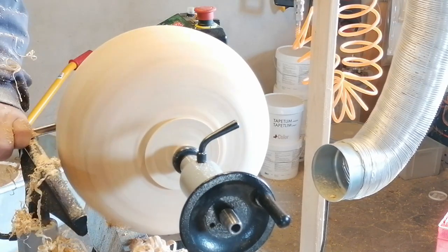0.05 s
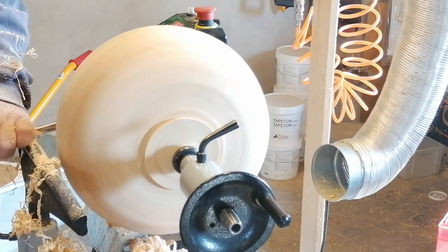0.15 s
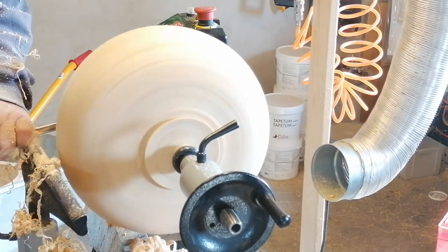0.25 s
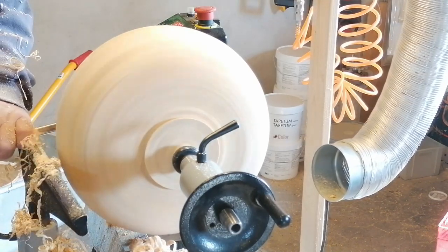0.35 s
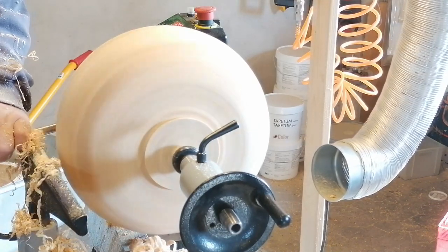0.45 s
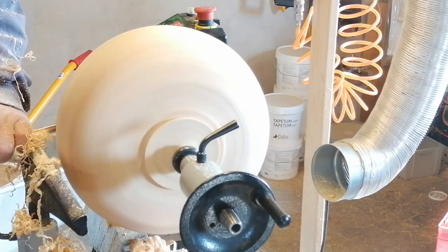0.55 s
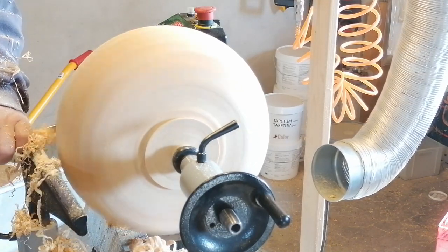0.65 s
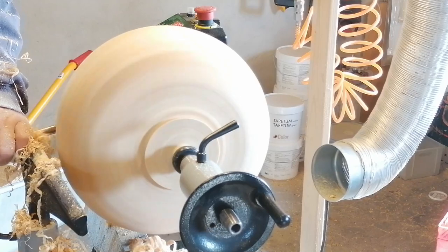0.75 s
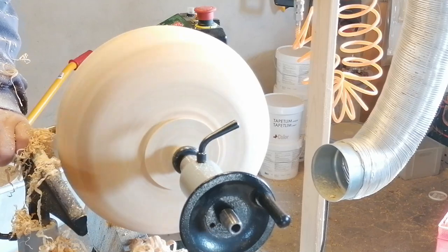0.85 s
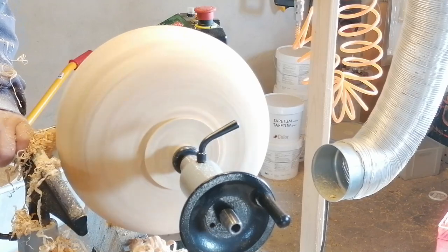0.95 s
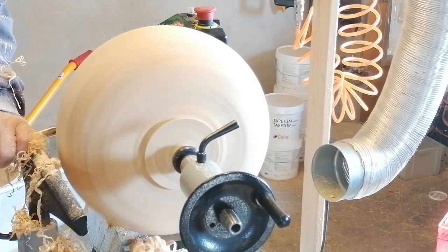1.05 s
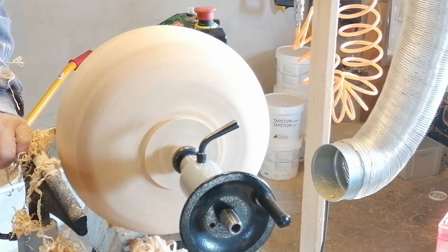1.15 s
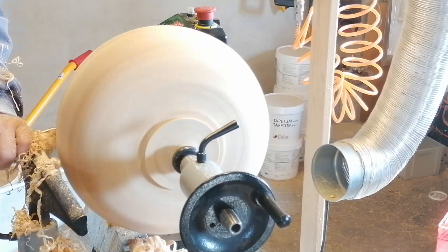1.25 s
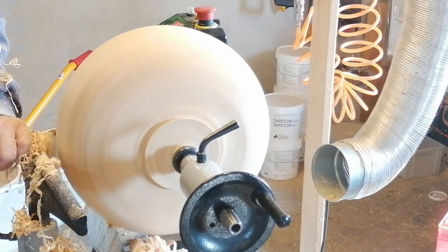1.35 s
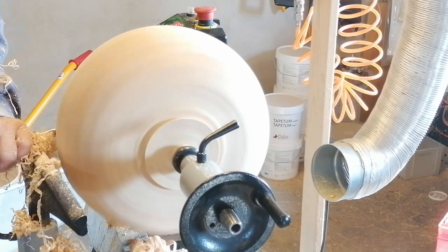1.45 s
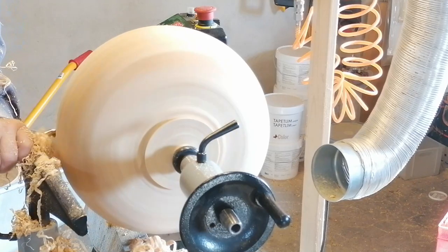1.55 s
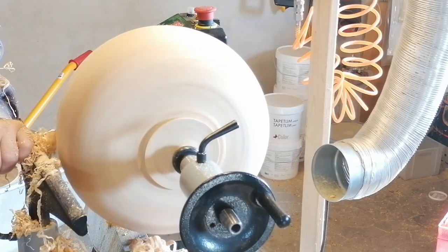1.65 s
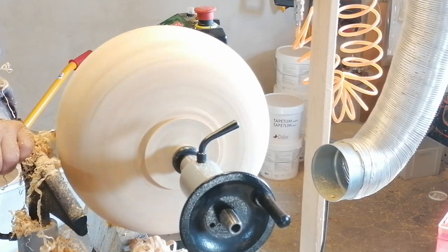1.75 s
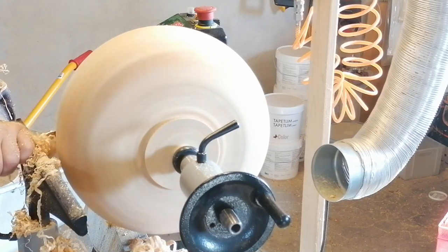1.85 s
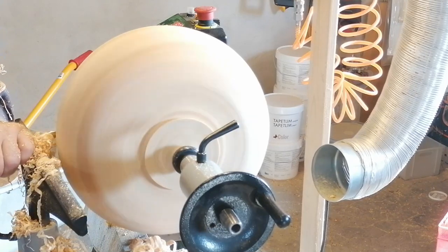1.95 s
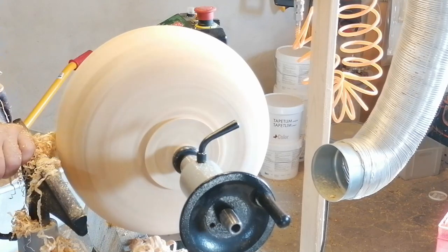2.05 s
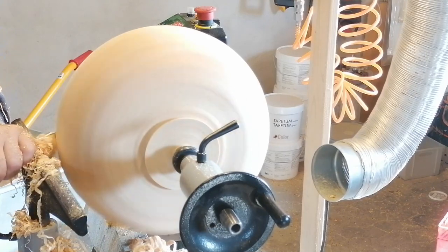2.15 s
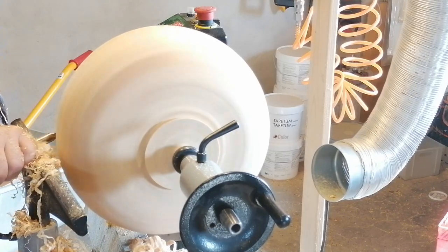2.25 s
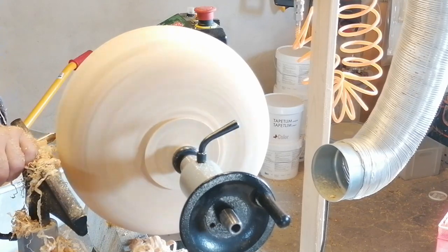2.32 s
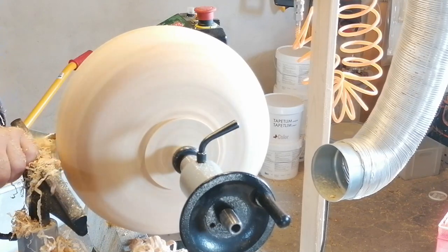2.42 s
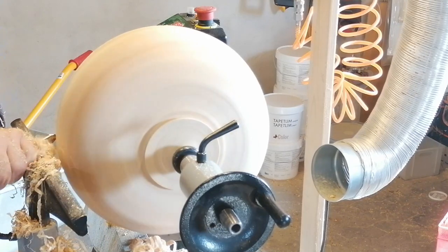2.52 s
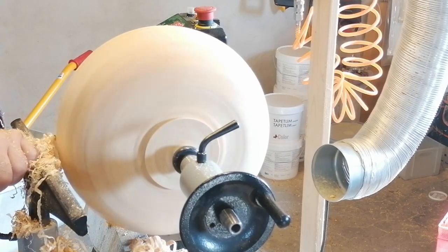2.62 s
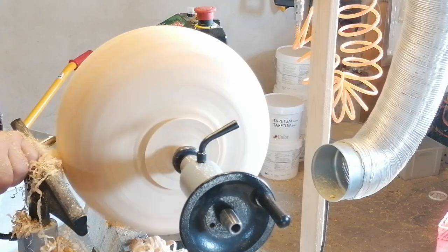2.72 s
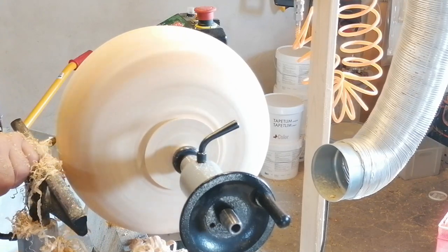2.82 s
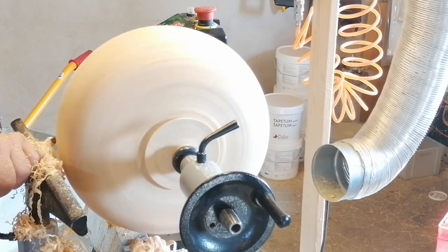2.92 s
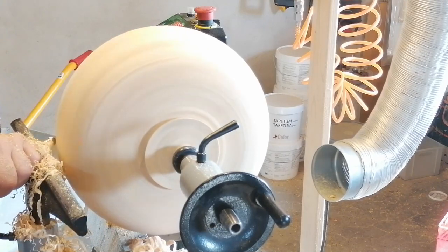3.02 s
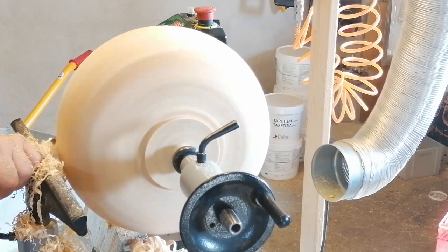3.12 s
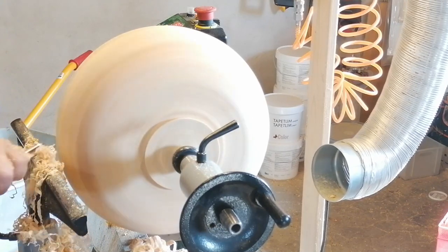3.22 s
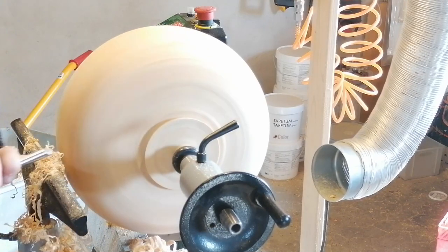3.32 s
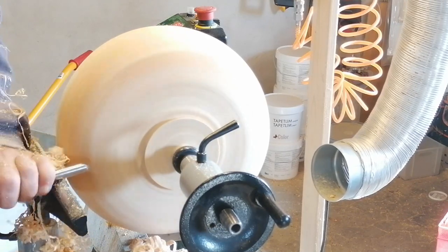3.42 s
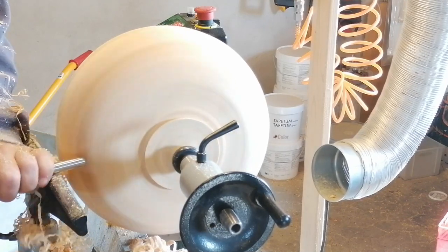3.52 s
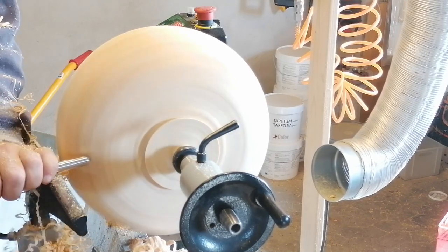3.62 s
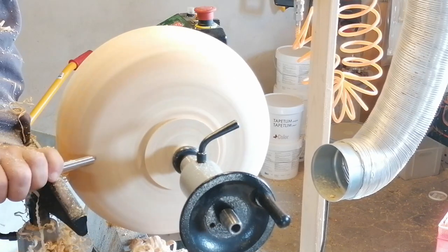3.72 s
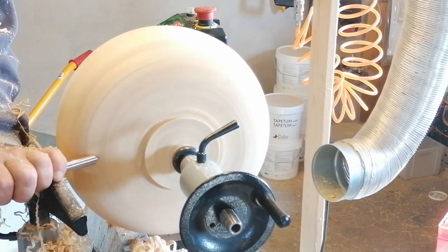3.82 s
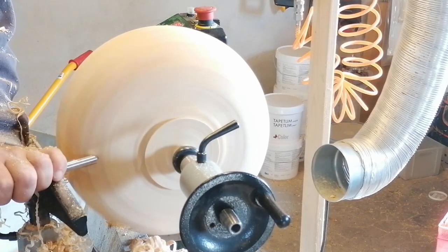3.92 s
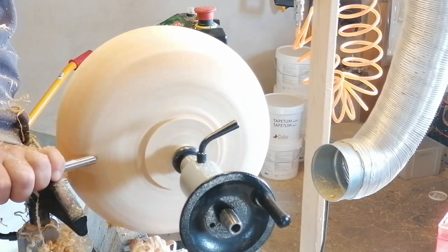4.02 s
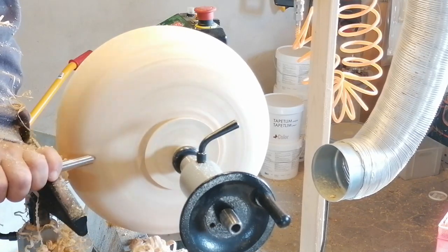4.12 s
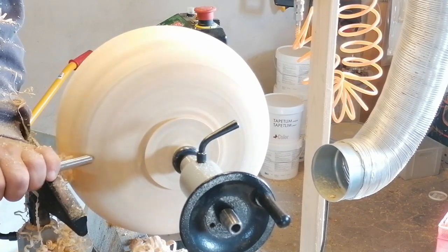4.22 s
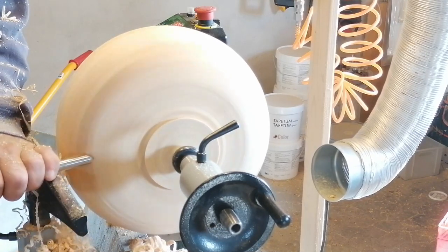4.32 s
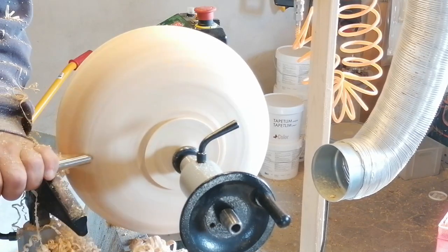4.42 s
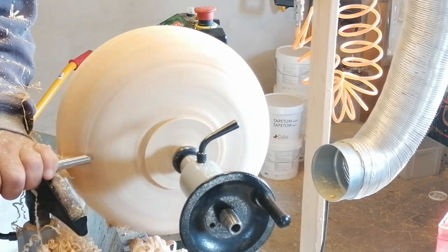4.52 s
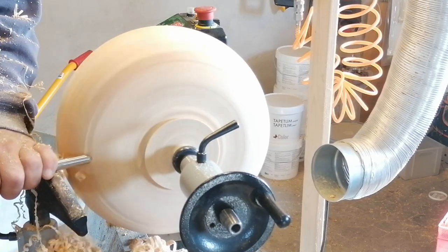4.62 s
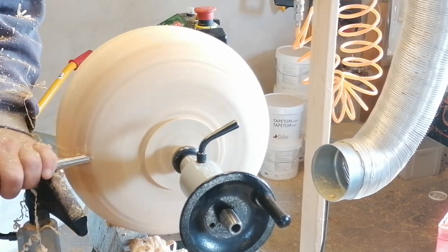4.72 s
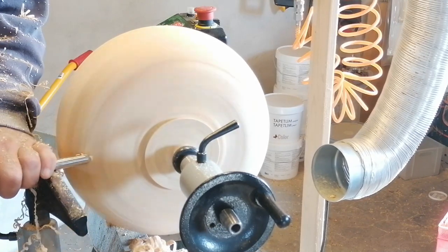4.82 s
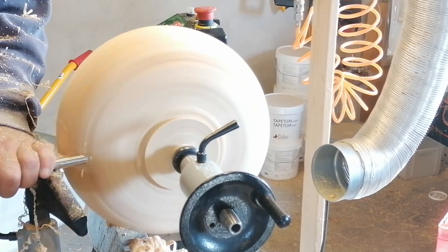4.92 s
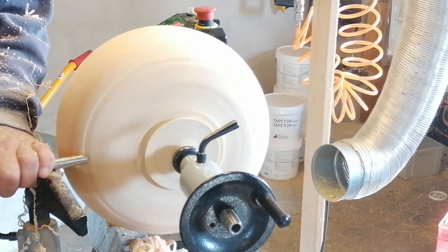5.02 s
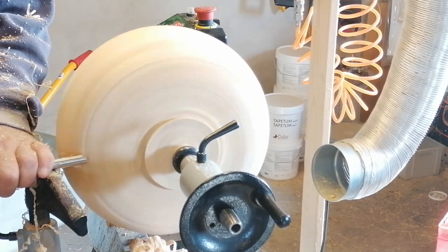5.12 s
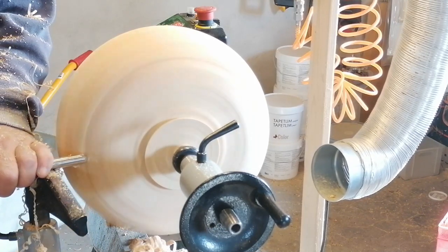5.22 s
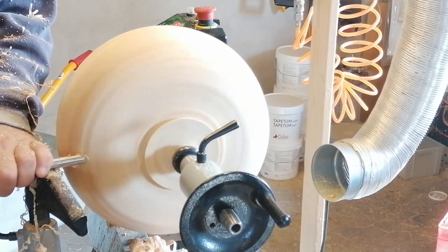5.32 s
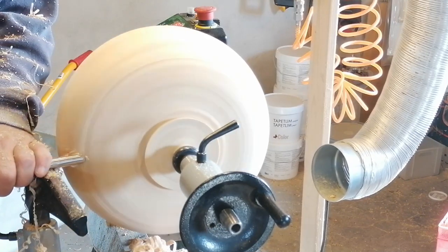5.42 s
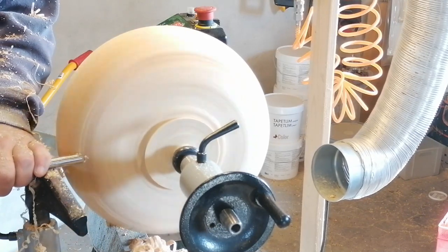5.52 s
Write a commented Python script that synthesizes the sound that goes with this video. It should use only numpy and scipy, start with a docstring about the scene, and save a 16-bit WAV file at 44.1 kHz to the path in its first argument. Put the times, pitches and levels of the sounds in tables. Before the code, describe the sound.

A wood lathe runs throughout with a quiet motor hum and a faint, very high whistle, heard close in a small, fairly dry workshop. After a few light touches, a gouge bites into the spinning bowl at about 0.3 seconds. It peels shavings with a rough, hissing rasp, fluttering rapidly as the grain comes round, with a slight metallic ring from the tool. From about 0.7 to 3.1 seconds a thin squeal comes in several pushes, each gliding slightly upward. The cut ends near 3.3 seconds, leaving only the machine. At 3.5 seconds the steel tool slides briefly onto its rest and knocks once, lightly. A second cut begins at about 3.9 seconds with much less squeal. From 4.4 seconds it turns into a harder, fast, regular chatter of tearing wood, continuing until the end at about 5.5 seconds.

```python
"""Turning a wooden bowl

A gouge peels a spinning bowl blank on a lathe in a small workshop. Tearing fibres excite the modes
of the tool, its rest and the wood; end grain comes round twice a turn and makes the edge bite harder,
and the curling shaving squeals. Between two cuts the tool is set down on the rest. Throughout, the
motor hums and its drive whistles faintly."""
import sys
import numpy as np
from scipy import signal
from scipy.fft import rfft, irfft, next_fast_len
from scipy.io import wavfile
from scipy.ndimage import uniform_filter1d

SR = 44100
rng = np.random.default_rng(int(sys.argv[2]) if len(sys.argv) > 2 else 0)


def bounce(signal):
    """Save signal as a 16-bit WAV file at the path given by the first command-line argument."""
    frames = np.transpose(np.atleast_2d(signal))
    limited = np.clip(frames, -1, 1)
    pcm = np.round(limited * 32767).astype(np.int16)
    wavfile.write(sys.argv[1], SR, pcm)


N = 245195
NOMINAL_FORCE_DB, MODE_WANDER_DB = -47, 1.6


def amp(db):
    """Amplitude ratio of a level in decibels."""
    return 10 ** (np.asarray(db) / 20)


def unit_rms(x):
    """Normalisation to unit power."""
    return x / np.sqrt(np.mean(x ** 2) + 1e-20)


def in_time(rows):
    """Linear interpolation of rows (time_s, values...): one curve per value column."""
    times, *columns = np.transpose(rows)
    return np.array([np.interp(np.arange(N) / SR, times, column) for column in columns])


def colour(x, points):
    """Spectral shaping by a curve of (frequency_hz, gain_db) on a logarithmic frequency axis."""
    size = next_fast_len(N)
    hz = np.maximum(np.arange(size // 2 + 1) * SR / size, 1)
    point_hz, point_db = np.transpose(points)
    gain = amp(np.interp(np.log(hz), np.log(point_hz), point_db))
    return irfft(rfft(x, size) * gain, size)[..., :N]


def cutoff(x, order, hz, kind="low"):
    """Maximally flat low-pass or high-pass filter."""
    return signal.sosfilt(signal.butter(order, hz, kind, fs=SR, output="sos"), x)


def drift(rate_hz):
    """Random modulation: low-passed noise of unit spread."""
    step = 40
    r = np.exp(-2 * np.pi * step * rate_hz / SR)
    slow = signal.lfilter([1], [1, -2 * r, r * r], rng.standard_normal(N // step + 2002))[2000:]
    return np.interp(np.arange(N) / step, np.arange(len(slow)), unit_rms(slow))


def resonator(hz, width_hz):
    """Filter coefficients of a damped oscillator with unit peak gain."""
    r = np.exp(-np.pi * width_hz / SR)
    return [(1 - r * r) / 2, 0, (r * r - 1) / 2], [1, -2 * r * np.cos(2 * np.pi * hz / SR), r * r]


def resonance(x, hz, width_hz):
    """Forced response of one mode."""
    return signal.lfilter(*resonator(hz, width_hz), x)


def lathe():
    """Machine noise: broadband rumble, narrow bands of motor hum and the drive's phase-modulated whistle."""
    # rumble spectrum: frequency_hz, density_db
    rumble = [(12, -57), (20, 1.5), (53, -6), (76, -6.5), (223, -9.5), (263, -5.5), (347, -13), (525, -7.5),
              (620, -8.5), (940, -9.5), (1460, -15.5), (11500, -33.5), (12030, -17), (12600, -43),
              (15000, -60)]
    # motor bands: centre_hz, width_hz, level_db
    motor = [(436.7, 34, -80), (514, 25, -78), (875, 6.7, -102), (1880, 18, -91)]
    white = rng.standard_normal((3, N))
    noise = amp(-72.5) * unit_rms(colour(white, rumble))
    for hz, width_hz, db in motor:
        noise += amp(db) * unit_rms(resonance(white, hz, width_hz))
    whistle_hz, whistle_db = 12023, -84
    whistle = np.sin(2 * np.pi * whistle_hz * np.arange(N) / SR + .9 * drift(12))
    stereo = .75 * noise[0] + .65 * noise[1:]
    return stereo + amp(whistle_db + .74 * drift(27)) * whistle


def bites():
    """Quasi-periodic forcing: end grain meets the edge each half turn. Rows: start_s, level_db, length_s."""
    # single bites and catches: start_s, level_db, length_s
    catches = [(0.092, -55.5, 0.037), (0.1201, -55.5, 0.045), (0.1615, -48.5, 0.023), (0.2534, -46, 0.017),
               (0.331, -30, 0.012), (0.3592, -32.5, 0.01), (0.446, -35, 0.0099), (0.552, -30.5, .014),
               (0.594, -30, 0.0075), (0.621, -28.5, 0.0061), (0.7085, -34, 0.012), (.763, -43, .015),
               (0.7982, -33, 0.019), (0.9832, -29.5, 0.0083), (1.2052, -29.5, 0.0043),
               (1.424, -33.5, 0.008), (1.514, -32.5, 0.0066), (1.996, -41, 0.0076), (2.1635, -35.5, 0.0055),
               (2.6719, -30, 0.0043), (2.7143, -29, 0.0078), (2.735, -36.5, 0.014), (2.847, -33.5, 0.011),
               (2.963, -36, 0.015), (2.982, -38, .015), (3.136, -35, 0.009), (3.915, -36.5, 0.016),
               (3.959, -33, 0.01), (4.001, -33, 0.016), (4.172, -33.5, 0.016), (4.385, -30, 0.016),
               (4.395, -35, 0.0061), (4.399, -30, 0.012), (4.441, -25.5, 0.011), (4.484, -26, 0.011),
               (4.527, -26.5, 0.013), (4.569, -28.5, 0.021), (4.606, -30, 0.014), (4.651, -27.5, 0.013),
               (4.695, -26, 0.012), (4.74, -28, 0.012), (4.784, -30.5, 0.017), (4.826, -29.5, 0.015),
               (4.869, -28, 0.012), (4.909, -29, 0.021), (4.955, -26.5, 0.0079), (4.985, -31.5, 0.017),
               (5.038, -28.5, 0.016), (5.084, -25.5, 0.016), (5.127, -26, 0.012), (5.17, -30.5, 0.022),
               (5.216, -28.5, 0.015), (5.219, -29, 0.0019), (5.257, -29.5, 0.012), (5.268, -29.5, 0.0048),
               (5.301, -29, 0.014), (5.339, -28, 0.02), (5.386, -30, 0.019), (5.428, -32.5, 0.015),
               (5.473, -34, .01), (5.493, -30, 0.012), (5.517, -27.5, 0.011), (5.526, -32, 0.0039)]
    # runs of bites: first_s, last_s, first_db, last_db, length_s, alternate_drop_db
    runs = [(0.289, 0.415, -37.5, -43.5, 0.041, -7), (0.5026, 0.9806, -34, -36.5, 0.015, 4),
            (1.224, 1.354, -37.5, -36.5, 0.029, 1), (1.448, 1.8442, -37.5, -36.5, 0.019, 3),
            (1.906, 2.127, -38.5, -35.5, 0.017, -2), (2.212, 2.645, -34.5, -36.5, 0.012, 1),
            (2.796, 2.93, -36, -38.5, 0.023, -1.5), (3.019, 3.097, -37, -36.5, .016, 2.5),
            (3.171, 3.259, -41, -35, 0.03, -0.5), (4.05, 4.132, -30.5, -33, 0.011, 6),
            (4.204, 4.343, -33, -34, 0.026, -1.5), (5.405, 5.446, -33, -38, 0.025, -5.5)]
    half_turn_s, scatter_s, scatter_db = .04325, .0015, 1.8
    rows = list(catches)
    for first_s, last_s, first_db, last_db, length_s, alternate_drop_db in runs:
        count = round((last_s - first_s) / half_turn_s) + 1
        scatter = rng.standard_normal((count, 2)) * [scatter_s, scatter_db]
        starts = np.linspace(first_s, last_s, count) + scatter[:, 0]
        levels = np.linspace(first_db, last_db, count) + scatter[:, 1]
        levels[1::2] -= alternate_drop_db
        rows += zip(starts, levels, np.full(count, length_s))
    return rows


def cutting_force():
    """Incoherent addition: the powers of steady peeling and of bites sum to the force envelope squared."""
    # steady peeling, one list per cut: time_s, level_db
    cuts = [
        [(0.27, -64), (0.36, -47.5), (0.48, -42.5), (1.1, -47.5), (1.45, -46.5), (1.81, -47.5), (2.43, -47),
         (2.82, -48), (3.28, -50), (3.36, -85)],
        [(3.93, -57), (3.974, -57), (4.096, -45), (4.392, -49.5), (4.932, -45), (5.062, -43), (5.56, -44.5)],
    ]
    outline = []
    for cut in cuts:
        outline += [(cut[0][0] - .01, -110), *cut, (cut[-1][0] + .0068, -110)]
    peeling = amp(in_time(outline)[0] + 1.5 + 1.6 * drift(112)) ** 2
    biting = np.zeros(N)
    t = np.arange(int(.06 * SR)) / SR
    centre_s, lead_s = .03, .003
    let_go = 1 - .5 * np.exp(-((t - centre_s) / .005) ** 2)   # the shaving lets go just before each bite
    for start_s, db, length_s in bites():
        rise = (1 - np.exp(-t / (.24 * length_s))) ** 2
        fall = np.exp(-(t / max(length_s, .003)) ** 3)
        bite, dip = int(start_s * SR), int((start_s - lead_s - centre_s) * SR)
        biting[bite:bite + len(t)] += amp(db - 6.5) ** 2 * (rise * fall)[:N - bite]
        peeling[dip:dip + len(t)] *= let_go[:N - dip]
    return np.sqrt(peeling + biting)


def fibres(per_s, spread_db):
    """Shot noise: fibres snap as random impulses of uneven size."""
    sizes = amp(spread_db * np.minimum(rng.exponential(1, (3, N)), 5)) * rng.standard_normal((3, N))
    return unit_rms(sizes * (rng.random((3, N)) < per_s / SR))


def tearing(snaps, force, mean_force):
    """Amplitude-modulated shot noise: the lows follow each bite, the top less so; a light touch is dull."""
    # tearing spectrum: frequency_hz, density_db
    spectrum = [(180, -63), (300, -16), (507, -24.5), (932, -8), (1030, -2.5), (1450, -12), (1880, -2.5),
                (2150, 4), (2620, 0.5), (2940, -6), (3600, -11), (4520, -3.5), (5310, -6.5), (7600, -8),
                (8250, -11), (9000, -6.5), (10400, -13), (11300, -16.5), (15200, -64)]
    broad = unit_rms(colour(snaps, spectrum))
    low = cutoff(broad, 2, 8500)
    excess = (force / amp(NOMINAL_FORCE_DB)) ** .053 - 1   # the treble grows faster than the force
    crisp = cutoff(low, 2, 2680, "high") * force * excess
    contact = np.minimum(mean_force / amp(-78), 1)
    top = (broad - low) * contact * force ** .42 * mean_force ** .62
    return amp(-8) * (low * force + crisp + top)


def dust_hiss(force, mean_force):
    """High-passed noise of the finest dust, modulated mainly by the mean force."""
    # hiss envelope: time_s, gain_db
    level = [(0.3, -15), (0.9, -21), (1.5, -22), (2.0, -19), (2.6, -16), (3.3, -14), (3.95, -16),
             (4.4, -16), (4.8, -10.5), (5.2, -21), (5.55, -25)]
    top = cutoff(rng.standard_normal((3, N)), 4, 11000, "high")
    hiss = colour(top, [(11000, -8), (13000, -6), (15000, -15.5)])
    return hiss * amp(in_time(level)[0]) * force ** .33 * mean_force ** .6


def squeal_curve():
    """Envelope and glide of the squeal over each push of the tool. Rows: time_s, gain_db, pitch_hz."""
    # pushes: start_s, end_s, gain_db, from_hz, to_hz
    pushes = [(0.73, 1.008, -3, 2940, 3560), (1.178, 1.467, -2.5, 3560, 3740),
              (1.467, 1.878, 2.5, 3370, 3600), (1.924, 2.306, 1, 3200, 3770),
              (2.534, 3.1, -6.5, 3400, 3860), (3.953, 4.298, -15, 3830, 3620),
              (4.403, 5.1, -28, 3340, 3200)]
    fade_share, idle_db = .19, -9.5
    rows = []
    for start_s, end_s, db, from_hz, to_hz in pushes:
        ends_db = min(db, idle_db)
        for part, gain_db in (0, ends_db), (fade_share, db), (1 - fade_share, db), (1, ends_db):
            rows.append((start_s + (end_s - start_s) * part, gain_db, from_hz + (to_hz - from_hz) * part))
    return rows


def squeal(drive):
    """Time-varying resonance: the curling shaving rings at a gliding pitch."""
    gain_db, pitch_hz = in_time(squeal_curve())
    drive = drive * amp(gain_db + 5.5 + MODE_WANDER_DB * drift(.34))
    out, state = np.zeros_like(drive), np.zeros((len(drive), 2))
    for i in range(0, N, 256):
        b, a = resonator(pitch_hz[i], width_hz=320)
        out[:, i:i + 256], state = signal.lfilter(b, a, drive[:, i:i + 256], zi=state)
    return out


def ringing(drive, force):
    """Modal superposition: snapping fibres drive the resonances of tool, rest, wood and shavings."""
    # mode groups: pitch_hz, width_hz, level_db, partner (-1 low, 1 high, 0 none)
    bed = [(115, 25, 0, 0), (195, 25, -1, 0)]
    rest = [(283, 36, 1.2, 0), (1394, 47, 11.7, 0), (7080, 240, 4.8, 0)]
    hollow = [(742, 26, 1, 0)]
    wood = [(830, 36, 1.5, 1), (1110, 90, -26, -1), (1266, 24, 2, 0)]
    rim = [(1530, 45, -8.5, 0), (1700, 260, 11.5, 0)]
    shank = [(2048, 63, 16, -1), (2192, 29, 6.4, 1), (2236, 33, 5.9, 1)]
    flute = [(2869, 40, 11.5, -1), (2930, 60, 8, 1), (3010, 70, 10.5, 1)]
    curl = [(3200, 46, 0, 0), (3370, 99, -5, 0), (3573, 51, -4, 0), (3753, 110, -1, 0), (4340, 76, -12, 0)]
    edge = [(3996, 52, 0.0045, 0)]
    tip = [(5155, 180, -4, 0), (4660, 110, -2.5, 0), (5000, 93, -1.5, 0), (5060, 40, 2.5, 0)]
    shavings = [(9980, 180, -20.5, 0), (9230, 370, -15.5, 0)]
    # group envelopes: time_s, gain_db
    bed_level = [(0.3, -24), (1.3, -28), (1.8, -30), (2.2, -30), (4.35, -22), (4.75, -17), (5.15, -23),
                 (5.55, -30.5)]
    rest_level = [(0.3, -22), (0.9, -35), (2.1, -41), (2.3, -37), (3.3, -41), (3.95, -14.5), (4.01, -8),
                  (4.17, -13.5), (4.27, -19), (5.3, -29.5), (5.42, -19), (5.55, -20.5)]
    hollow_level = [(0.3, -10.5), (0.6, -14.5), (0.9, -12.5), (1.2, -18), (1.6, -37), (1.8, -16.5),
                    (2.2, -14), (2.45, -32), (2.8, -16), (3.3, -29), (3.95, -19), (4.3, -30), (4.45, -32),
                    (5.55, -46)]
    wood_level = [(0.3, -15), (0.5, -8), (0.7, -23), (2.2, -21), (3.3, -16), (3.95, -26), (4.4, -13),
                  (5.15, -13), (5.55, -16)]
    rim_level = [(0.3, -12.5), (0.55, -8.5), (0.7, -18), (1.2, -14.5), (1.6, -14.5), (2.2, -16.5),
                 (2.7, -18), (3.3, -18.5), (3.95, -13), (4.4, -13.5), (5.0, -14.5), (5.55, -17.5)]
    shank_level = [(0.27, -24), (0.34, -12), (0.6, -12), (1.1, -8.5), (1.4, -12), (1.6, -0.5), (1.9, -21),
                   (2.4, -11.5), (2.6, -7.5), (2.72, 0), (3.0, -7.5), (3.3, -3), (3.95, -22), (4.15, -10),
                   (4.35, -10), (4.8, -9.5), (5.2, -7.5), (5.55, -9)]
    flute_level = [(0.3, -16.5), (0.65, -22), (0.82, -8), (1.1, -16), (1.3, -10), (1.8, -6), (2.0, -13),
                   (2.1, -14.5), (2.6, -20), (2.68, -8.5), (2.76, -19.5), (3.3, -19), (3.95, -12),
                   (4.3, -16.5), (4.45, -10.5), (5.0, -11), (5.55, -9.5)]
    edge_level = [(0.299, -20), (0.6, -9), (1.0, -5), (1.15, -12), (1.3, -1), (1.45, -4), (1.6, -11),
                  (1.95, -1), (2.05, -7), (2.2, 4), (2.35, -11), (2.85, -3.5), (3.3, -18), (3.95, -18),
                  (4.1, -12), (4.3, -13), (5.55, -19)]
    tip_level = [(0.3, -13), (0.7, -19), (0.85, -10), (0.94, -1.5), (1.05, -12.5), (1.5, -9.5), (2.3, -10),
                 (2.6, -5), (2.72, -3.5), (3.05, -4.5), (3.3, -9.5), (3.95, -5), (4.2, -13), (4.45, -7.5),
                 (4.75, -14.5), (4.95, -12.5), (5.55, -14.5)]
    shavings_level = [(0.3, 6), (0.85, -1), (1.05, 14), (1.3, 11.5), (1.5, -1), (1.7, 11), (1.95, 10.5),
                      (2.15, 4), (3.3, 5), (3.95, 5), (4.35, 0), (5.55, 1)]
    # the tool's overhang hands energy from low to high partners: time_s, overhang_share
    overhang = [(0.3, 0.2), (1.1, 0.32), (1.3, 0.5), (2.0, 0.41), (2.3, 0.84), (3.3, 0.92), (3.95, 0.42),
                (4.35, 0.63), (4.55, 0.58), (4.75, 0.82), (5.55, 0.55)]
    groups = [(bed, bed_level), (rest, rest_level), (hollow, hollow_level), (wood, wood_level),
              (rim, rim_level), (shank, shank_level), (flute, flute_level), (curl, squeal_curve()),
              (edge, edge_level), (tip, tip_level), (shavings, shavings_level)]
    high = np.clip(in_time(overhang)[0], .03, .97)
    share = {-1: 1 - high, 0: 1, 1: high}
    squeal_hz = in_time(squeal_curve())[1]
    out = np.zeros((3, N))
    for modes, level in groups:
        group_db = in_time(level)[0]
        for hz, width_hz, db, partner in modes:
            noise_gain = np.sqrt(SR / (np.pi * width_hz))   # white drive keeps its rms
            gain = noise_gain * share[partner] * amp(group_db + db - 11 + MODE_WANDER_DB * drift(6.8))
            if modes is curl:   # strongest near the squeal's pitch
                gain *= amp(-6 * ((squeal_hz - hz) / 400) ** 2)
            if modes is flute:   # answers hard bites more than in proportion
                gain *= (force / amp(NOMINAL_FORCE_DB)) ** .5
            out += resonance(gain * drive, hz, width_hz)
    return out


def gouge():
    """Source and filter: one cutting force scales the squeal, the modes, the tearing and the hiss."""
    force = cutting_force()
    mean_force = np.sqrt(uniform_filter1d(force ** 2, size=3000))   # running rms
    snaps = fibres(per_s=18000, spread_db=2.5)
    drive = snaps * force
    rings = cutoff(squeal(drive) + ringing(drive, force), 4, 11000)
    other_snaps = snaps[:, ::-1]   # reversed, so uncorrelated with the drive
    return rings + tearing(other_snaps, force, mean_force) + dust_hiss(force, mean_force)


def tool_set_down():
    """Friction and impact: steel slides onto the rest and knocks once; both excite the tool's modes."""
    # sliding friction: time_s, level_db
    slide = [(3.518, -75), (3.527, -55), (3.535, -48), (3.546, -50), (3.559, -55), (3.578, -73)]
    # tool modes: pitch_hz, knock_db, rub_db, t60_s
    modes = [(270, -62, -20, .04), (650, -68, -24, .04), (1262, -42, -9, .085), (1610, -66, -20, .05),
             (2236, -54, 3, .07), (2480, -60, -9, .04), (3040, -50, -7, .025), (4050, -55, -13, .025),
             (4900, -62, -22, .025), (5460, -55, -19, .025), (6760, -56, -20, .03)]
    knock_s, crack_decay_s = 3.5428, .0026
    start = int(slide[0][0] * SR)
    t = slide[0][0] + np.arange(8000) / SR
    white = rng.standard_normal((3, len(t)))
    rub = amp(np.interp(t, *np.transpose(slide), right=-120)) * white
    click = np.zeros(len(t))
    click[int(knock_s * SR) - start] = 1
    crack = amp(-39) * (t > knock_s) * np.exp(-np.abs(t - knock_s) / crack_decay_s) * white[:, ::-1]
    rings = resonance(amp(-20) * rub + crack, hz=3500, width_hz=4000)
    for hz, knock_db, rub_db, t60_s in modes:
        width_hz = np.log(1000) / (np.pi * t60_s)
        click_gain = SR / (2 * np.pi * width_hz)   # a unit click rings at height 1
        drive = amp(knock_db) * click_gain * click + amp(rub_db) * np.sqrt(2 * click_gain) * rub
        rings += resonance(drive, hz, width_hz)
    out = np.zeros((3, N))
    out[:, start:start + len(t)] = cutoff(rings, 3, 7500)
    return out


def to_stereo(parts):
    """Partial coherence: of three parts (common, left, right), the common one reaches both sides."""
    # stereo image: time_s, left_minus_right_db, common_share
    image = [(0.0, 3.5, 0.22), (0.74, -2.5, 0.15), (1.2, -1, 0.05), (2.4, 0, 0.18), (3.0, 0.5, 0.1),
             (3.4, -1, 0.36), (3.72, 0.5, 0.25), (3.9, -0.5, 0.36), (5.56, 0, 0.28)]
    pan_db, common = in_time(image)
    right_lag_s = .00029
    bass = cutoff(parts, 2, 500)   # long waves reach both sides much alike
    upper = parts - bass
    late = np.interp(np.arange(N) - right_lag_s * SR, np.arange(N), upper[0])
    pair = np.sqrt(common) * np.array([upper[0], late]) + np.sqrt(1 - common) * upper[1:]
    pair += .8 * bass[0] + .55 * bass[1:]
    return pair * amp(pan_db * [[.5], [-.5]])


def room(x, t60_s):
    """Reverberation: convolution with exponentially decaying noise, one tail a side."""
    t = np.arange(int(.3 * SR)) / SR
    tail = rng.standard_normal((2, len(t))) * amp(-60 * t / t60_s) * (t > .004)
    tail = signal.lfilter([1], [1, -.5], tail)   # softens the treble
    tail /= np.sqrt(np.sum(tail ** 2, axis=1, keepdims=True))
    return signal.fftconvolve(x, tail, axes=1)[:, :N]


def scene():
    """Superposition of the tool's direct sound, its reverberation and the running lathe."""
    direct = to_stereo(gouge() + tool_set_down())
    return direct + amp(-17) * room(direct, t60_s=.17) + lathe()


def record(dry):
    """Equalisation and band limiting: the sides differ a little in colour, and the top is cut."""
    # stereo balance: frequency_hz, left_minus_right_db
    balance = [(60, -2.5), (240, 2.5), (940, 3), (3720, 3), (14700, -3.5)]
    sides = [colour(side, np.array(balance) * [1, share]) for side, share in zip(dry, (.5, -.5))]
    return signal.sosfilt(signal.ellip(12, .5, 60, 15100, fs=SR, output="sos"), sides)


dry = scene()
out = record(dry)
bounce(out)
```